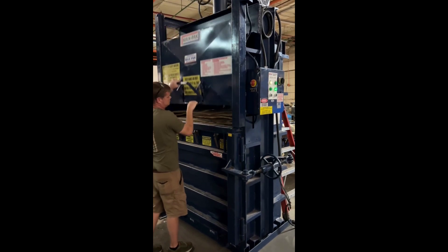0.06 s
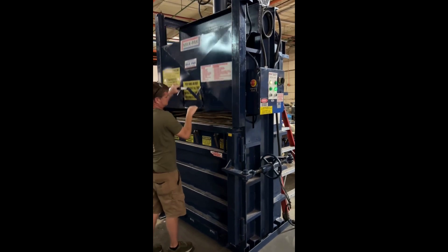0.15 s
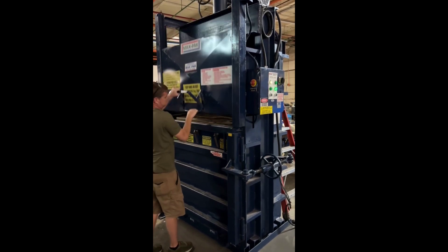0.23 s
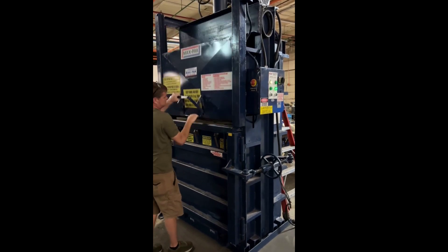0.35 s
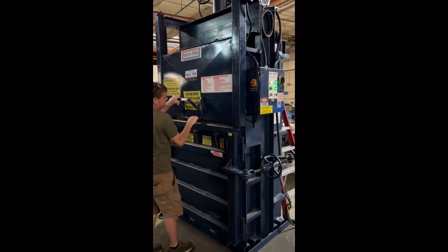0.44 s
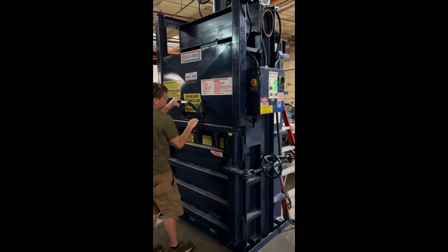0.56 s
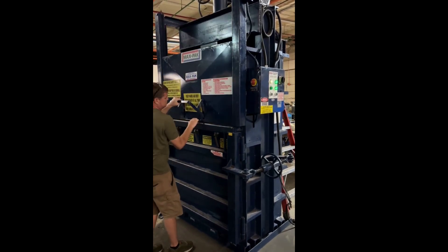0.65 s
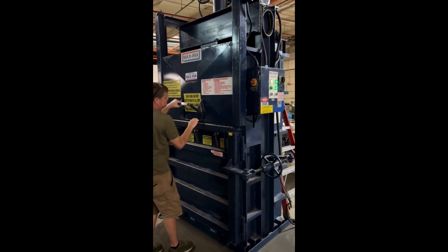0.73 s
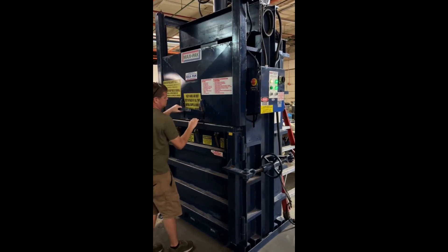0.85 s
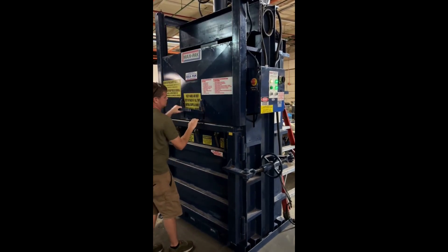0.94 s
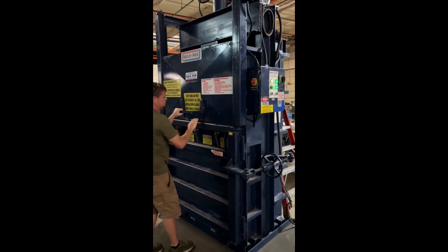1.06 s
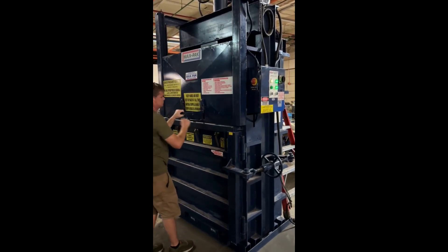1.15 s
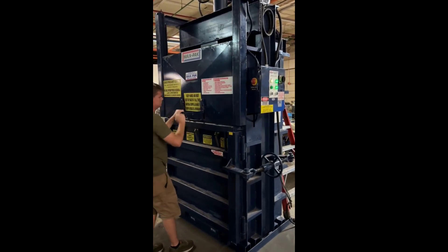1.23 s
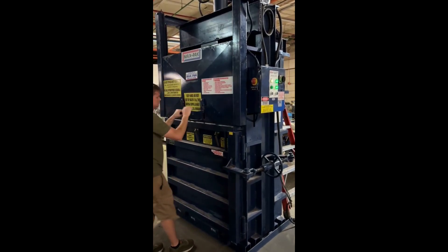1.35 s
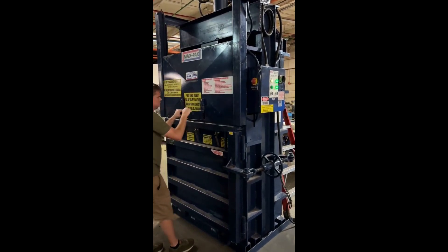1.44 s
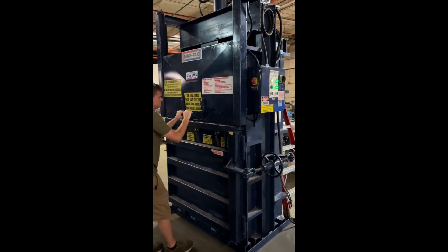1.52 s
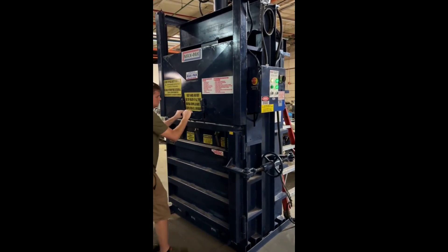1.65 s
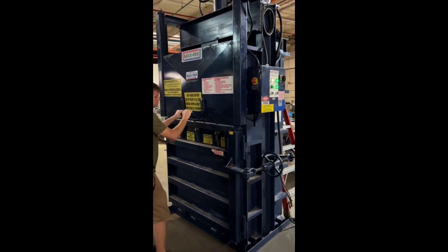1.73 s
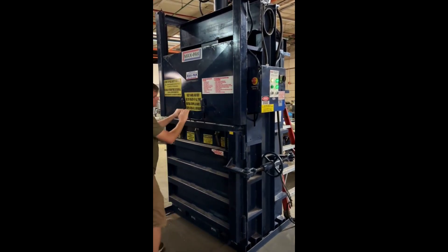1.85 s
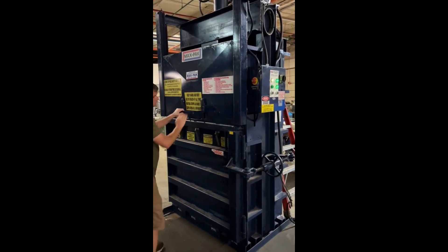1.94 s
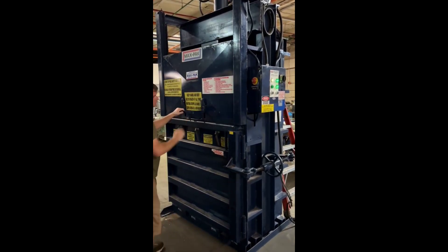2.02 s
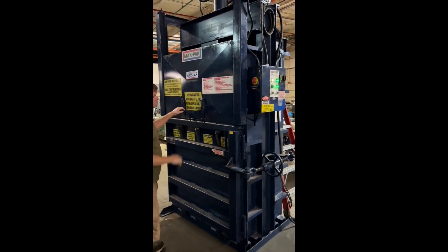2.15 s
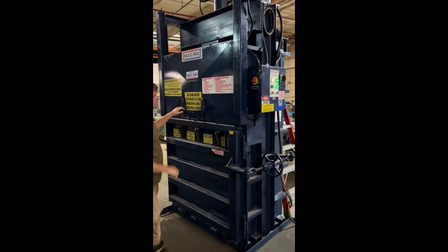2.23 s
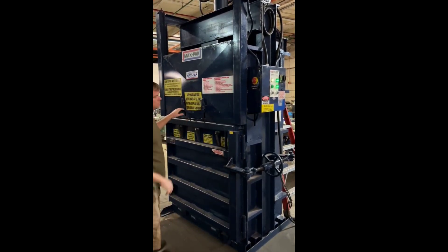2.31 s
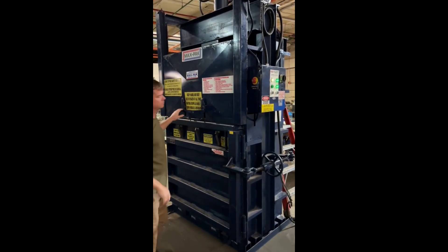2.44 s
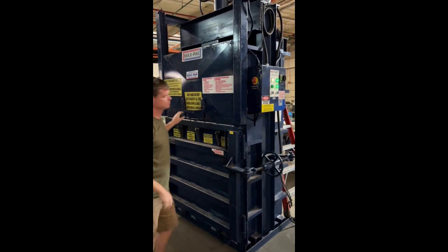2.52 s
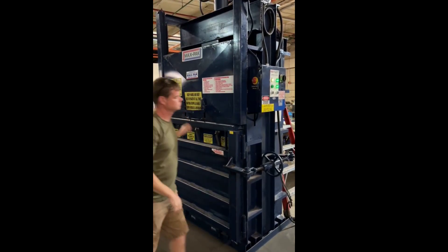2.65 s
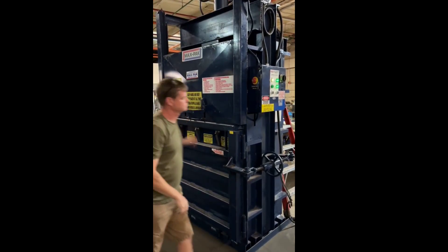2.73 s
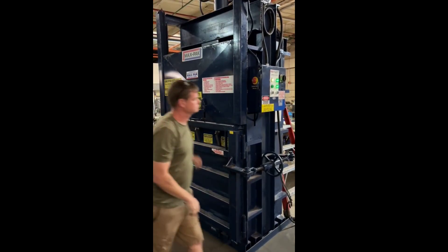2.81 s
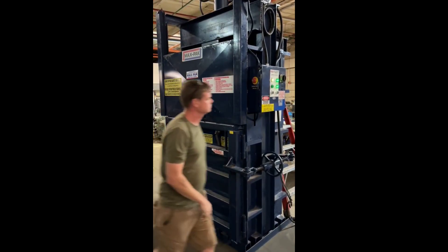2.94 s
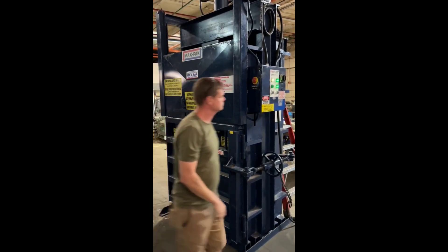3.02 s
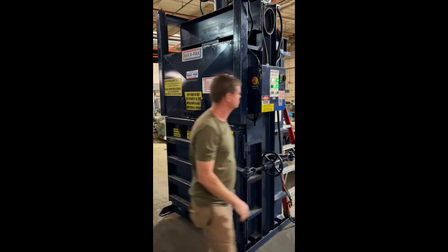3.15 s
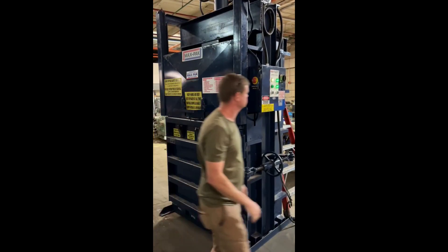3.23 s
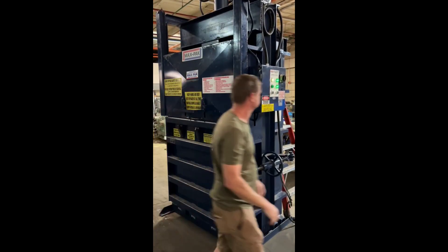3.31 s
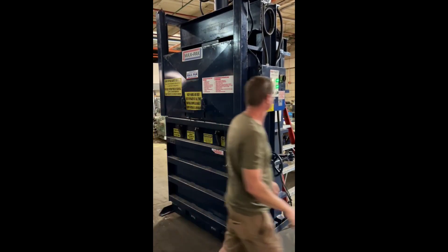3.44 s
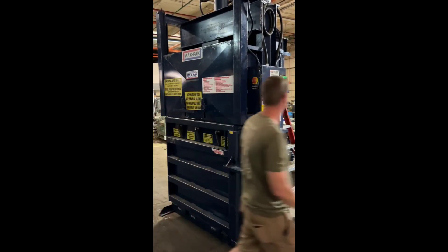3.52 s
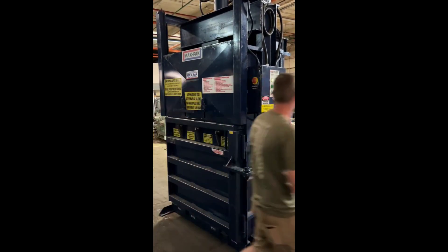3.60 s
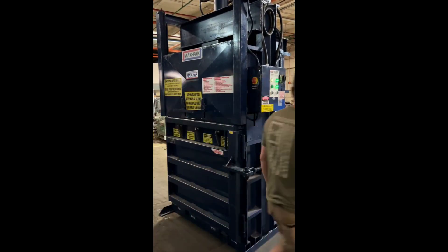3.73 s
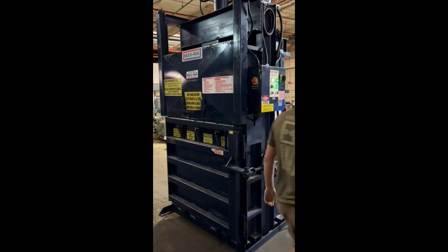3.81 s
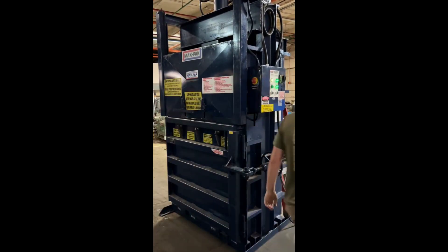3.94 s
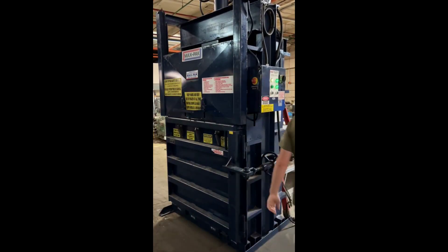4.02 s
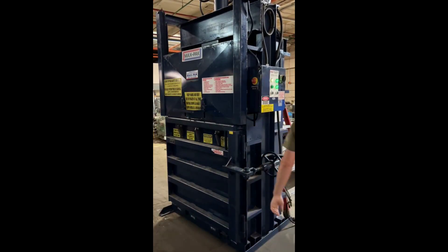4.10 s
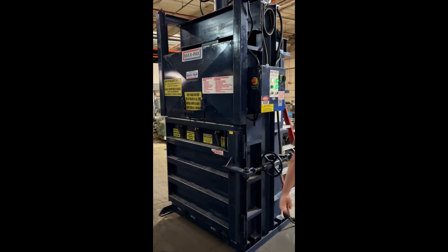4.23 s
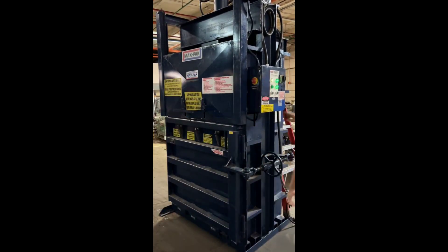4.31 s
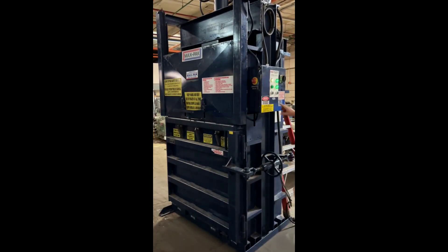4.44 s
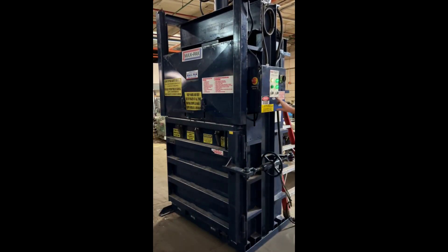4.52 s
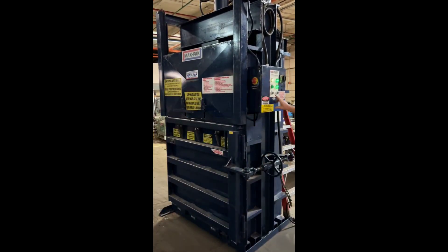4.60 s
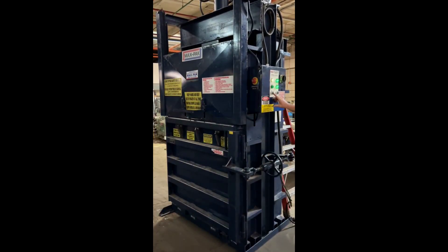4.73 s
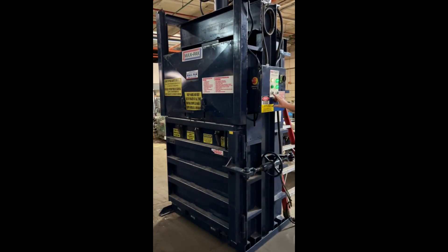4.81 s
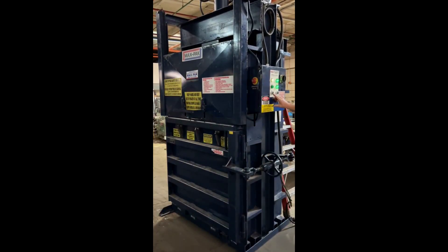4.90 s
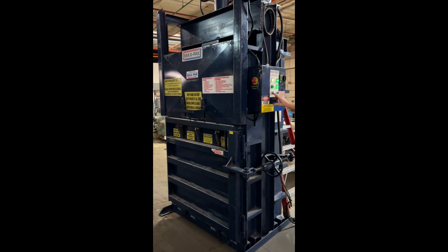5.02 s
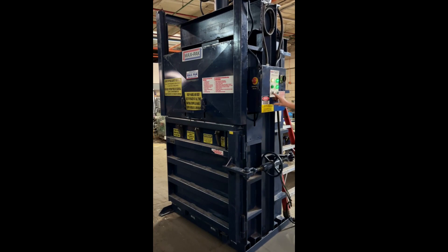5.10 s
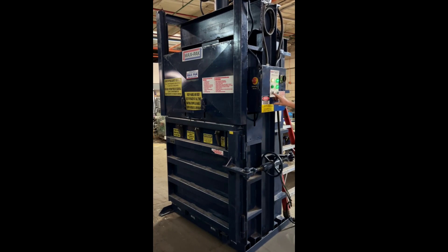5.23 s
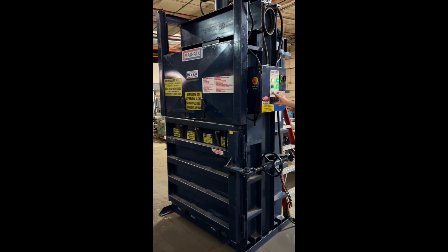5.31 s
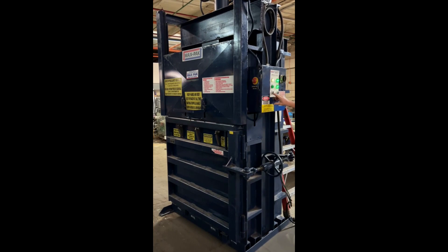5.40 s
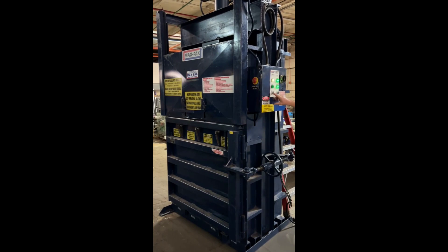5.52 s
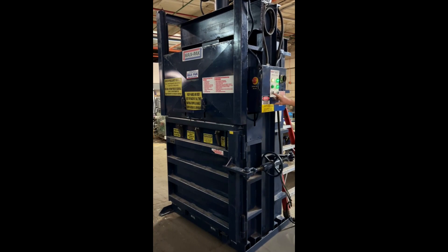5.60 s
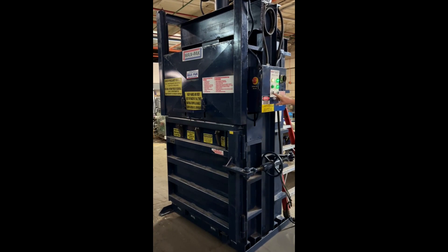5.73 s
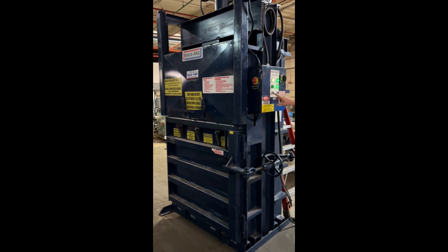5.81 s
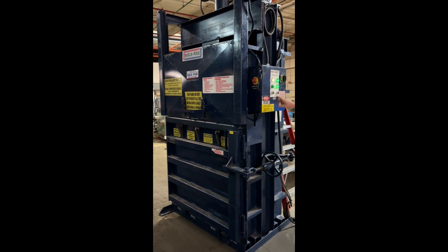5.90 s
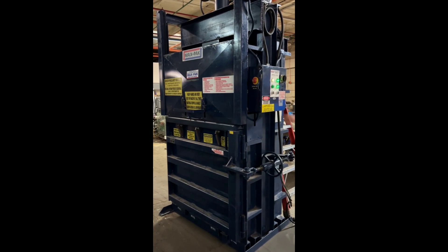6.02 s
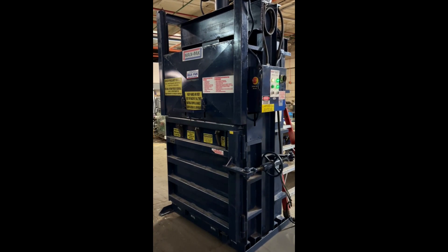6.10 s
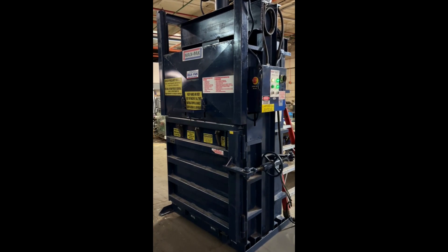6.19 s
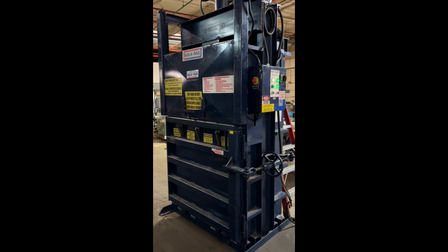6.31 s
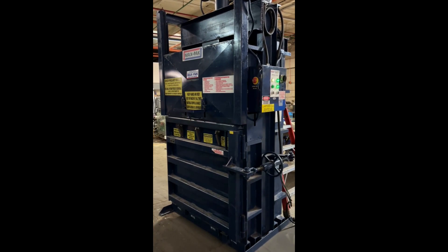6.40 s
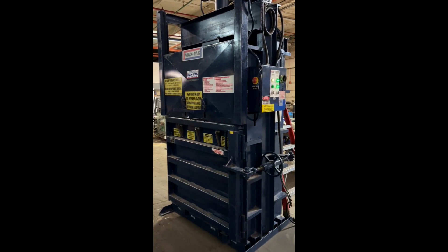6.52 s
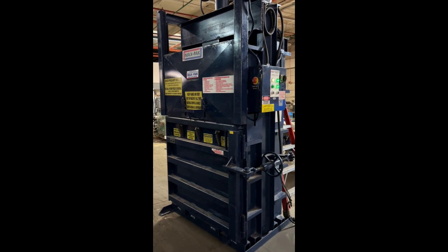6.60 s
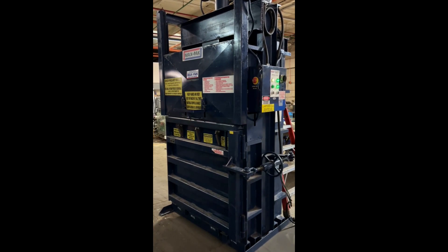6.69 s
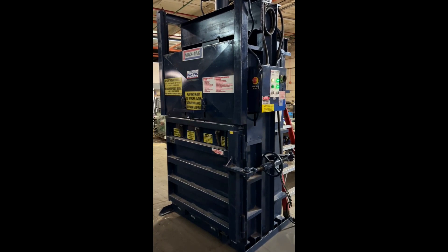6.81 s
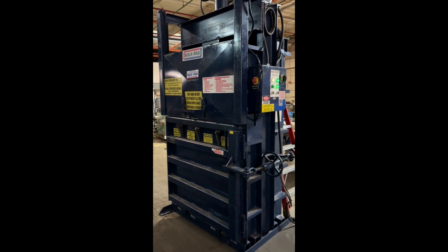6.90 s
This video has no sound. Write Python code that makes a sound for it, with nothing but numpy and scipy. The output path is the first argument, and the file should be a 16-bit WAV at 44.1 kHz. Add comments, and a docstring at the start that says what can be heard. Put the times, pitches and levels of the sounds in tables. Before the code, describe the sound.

Stereo phone pickup in a big, echoing warehouse over a low fan drone. First, rolling rumble and rail chatter, then a hard metallic crash with boomy frame ringing and scattered rattles, followed by smaller clank and a second double slam. Light shoe scuffs pass, one squeaking briefly. Finally a sharp electrical click, a short falling motor groan, and a pump's buzzing, oily hum that holds to the end.

```python
"""Baler gate and pump start

A steel gate rumbles down its rails, slams, rattles and is slammed again: noise bursts ring frame and plate.
Shoes scuff grit (gated noise) and squeak once (gliding tone). A contactor snaps, a motor groans (resonant
noise, falling tone) and a vane pump settles into a hum of shaft orders over oil churn and fan hiss.
A large warehouse drones and echoes; a phone's two ports hear it with a frequency-dependent lag."""
import sys
import numpy as np
from scipy import signal
from scipy.fft import rfft, irfft, next_fast_len
from scipy.io import wavfile
from scipy.ndimage import map_coordinates

SR = 44100
rng = np.random.default_rng(int(sys.argv[2]) if len(sys.argv) > 2 else 0)


def output_pcm(signal):
    """Save a mono or channel-first signal as 16-bit PCM at the path in sys.argv[1].

    Samples are clipped to [-1, 1] before scaling.
    """
    pcm = np.clip(np.atleast_2d(signal).T, -1, 1) * 32767
    wavfile.write(sys.argv[1], SR, np.round(pcm).astype(np.int16))


N = 306495

# Warehouse air. Each row: time in seconds, drone level in dB, mid-band wash level in dB.
AIR = [(0, -57.5, -39), (2.4, -48.5, -54), (3.2, -45, -55), (4.3, -46, -55), (5, -50.5, -54.5),
       (6.95, -61, -67)]
# Drone spectrum. Each row: frequency in Hz, relative level in dB per Hz.
DRONE_SPECTRUM = [(12, -62.5), (20, -40), (43, 9.5), (81, 5.5), (113, 1), (141, -12.5), (203, -10.5),
                  (271, -29.5), (400, -25.5), (520, -78), (880, -120)]
# Mid-band wash spectrum. Each row: frequency in Hz, relative level in dB per Hz.
WASH_SPECTRUM = [(200, 11.5), (400, 1.5), (1000, -0.5), (2000, -11.5), (4000, -16), (8000, -30),
                 (15000, -40)]
# Fan tones. Each row: frequency in Hz, amplitude in dB before the common lift.
FANS = [(91.5, -52), (113.0, -52.5), (204.6, -63), (242.2, -66.5)]
# Echo decay of the hall. Each row: frequency in Hz, T60 in seconds.
HALL_T60 = [(60, 1.98), (160, 1.4), (420, 1.6), (1100, 1.18), (2900, 1.56), (7700, 0.75), (14000, 0.26)]

# Rollers in the rails. Each row: frequency in Hz, relative level in dB per Hz.
RAIL_SPECTRUM = [(18, -39), (30, -28), (49, -6), (181, -4.5), (217, -1.5), (423, -10.5), (509, -6),
                 (955, -23), (2320, -23), (2500, -27), (3250, -60.5), (5500, -120)]
RUMBLE_DB, RATTLE_DB, SLOWS_DB_PER_S = -32.5, -47, -17.5  # quieter as the gate slows
JOLT_DB, JOLT_S = 8, 0.014  # extra level at the start, its decay
REST_S, SETTLE_S = 0.55, 0.02  # rollers come to rest, fade time

# Gate blows. Each row: start in seconds, crack level in dB before the plate, then boom, clang, sizzle
# and ring in dB re crack, and the centre in Hz of the modes rung hardest.
BLOWS = [(0.396, -39.5, 2.5, 2.5, 1, -2, 500), (0.539, -32, 1.5, -7, -13.5, -11, 600),
         (0.555, -16.5, 0, 6, -0.5, 3.5, 790), (0.575, -18, -3.5, -6.5, -4.5, -15, 1390),
         (0.585, -18.5, 6, -9.5, 3, 8.5, 90), (0.611, -23.5, 6, -1.5, -4, -10, 215),
         (0.632, -18.5, 0.5, 6.5, -4, 2, 750), (0.6456, -9, -16.5, -11, -1.5, -7, 3617),
         (0.6596, -18, 1, -10.5, 0.5, -5.5, 2315), (0.6792, -23.5, -1.5, -2.5, -5, 9, 265),
         (0.709, -30.5, -1, -0.5, -6.5, -4, 2200), (0.74, -33, 13.5, -1, -16.5, 6, 230),
         (0.781, -25, -3, 3.5, -1, -2, 1400), (0.809, -30, 10.5, -0.5, 2.5, -7, 700),
         (0.87, -36, 1.5, -5.5, -5.5, 8.5, 645), (0.9904, -28, 5.5, 2, 1.5, 1, 596),
         (1.039, -42, 4.5, 12.5, -20, -4, 595), (1.495, -42, 3, 12, 2.5, 5, 400),
         (1.5042, -23.5, 8, 4, 0.5, 2, 1500), (1.5224, -20, -2, 6, -5, 7, 650),
         (1.55, -30, 7.5, -1, 0.5, 5.5, 376), (1.61, -36.5, 8.5, 6.5, -30, 12.5, 560)]
# Modes of the heavy frame. Each row: frequency in Hz, relative level in dB, T60 in seconds.
FRAME_MODES = [(85.7, 0.5, 0.41), (164, -2.5, .5), (223, -6.5, 1), (273, 4.5, 0.13), (351, -3.5, 0.16),
               (402.6, -5, 0.52), (581, -5.5, 0.24), (658.3, 3.5, 0.072), (722, 1.5, 0.081),
               (1045, -7.5, 0.36), (1400, -7.5, 0.23), (1510, -4, 0.15), (2298, 0.5, 0.2),
               (3410, -5.5, 0.24), (3830, -11, 0.15)]
# Short plate resonances. Each row: frequency in Hz, width in Hz, level in dB.
PLATE = [(98, 75, 0.5), (163, 41, 2.5), (216.4, 52, -6), (303, 24, 3.5), (516, 110, -1), (631, 127, 3),
         (770, 87, -3), (1093, 53, 2), (1410, 190, -6), (1670, 36, -0.5), (1925, 160, -2.5),
         (2358, 220, 0.5), (2630, 140, 4.5), (3250, 540, 0.5), (5200, 900, -3)]
# Low body of a blow. Each row: frequency in Hz, relative level in dB per Hz.
BOOM_SPECTRUM = [(30, -35), (60, -2), (95, -10), (230, -2), (450, -10.5), (900, -55.5)]
# Middle of a blow. Each row: frequency in Hz, relative level in dB per Hz.
CLANG_SPECTRUM = [(150, -13), (350, -12.5), (670, 5.5), (1100, -3), (2300, -10), (4000, -62.5)]
# Sharp contact noise. Each row: frequency in Hz, relative level in dB per Hz.
CRACK_SPECTRUM = [(600, -14.5), (1500, -1.5), (2500, 2.5), (4500, 4.5), (5600, -1), (7000, -9.5),
                  (12000, -13)]
# Treble contact noise. Each row: frequency in Hz, relative level in dB per Hz.
SIZZLE_SPECTRUM = [(3000, -19.5), (6000, -3), (8500, 5.5), (12500, -5), (14000, -19.5), (16000, -21.5)]
CONTACT_S = 0.021  # base decay of a blow, scaled for each part
REACH_OCT, REACH_DB = 0.56, -15  # spread of the modes rung hardest, level of the modes beyond
TICKS, TICK_DB, TICK_FADE_DB_PER_S = 14, -8, 77  # loose parts per blow, level re crack, later ones weaker
TICK_SPREAD_S, TICK_HZ, TICK_OCT, TICK_T60_S = 0.037, 3310, 0.6, 0.04  # mean delay; pitch, its spread; ring

# Scuffs. Each row: start in seconds, scrape level in dB, thud in dB re scrape, hiss in dB re scrape,
# scrape centre in Hz, length in seconds.
SCUFFS = [(1.929, -62, -21.5, 1, 2460, 0.022), (2.097, -57, -2.5, -6.5, 2957, 0.057),
          (2.133, -48, -15, -20, 2102, 0.012), (2.29, -62, -2, -5.5, 2470, 0.1),
          (2.622, -55, 5.5, 6, 1950, 0.0293), (2.639, -44, -3.5, -25.5, 500, 0.033),
          (2.655, -39.5, -14, -20.5, 1550, 0.07), (2.677, -44.5, -25, -7, 3420, 0.043),
          (2.711, -45, -11, -17, 1800, 0.06), (2.8184, -45, -10.5, -8.5, 2550, 0.039),
          (2.843, -52, 0.5, -5, 900, 0.032), (2.97, -54.5, -19, -7, 2030, 0.049),
          (3.049, -52.5, -12, -8, 3006, 0.012), (3.261, -45.5, 3, -7, 1210, 0.0058),
          (3.3335, -30.5, -12.5, -14, 1770, 0.032), (3.361, -31.5, -11, -16, 1880, 0.017),
          (3.382, -47.5, -10.5, -15, 2200, 0.022), (3.424, -42, -4.5, -6, 2250, 0.034),
          (3.56, -57, -2, -4.5, 1820, 0.051), (3.985, -52.5, 0.5, -7.5, 1300, 0.047),
          (4.016, -60, -2.5, -9, 2630, 0.15), (4.156, -63, 3, 5, 3000, 0.015),
          (4.604, -67, 4, 6, 3450, 0.023), (4.791, -54, -5.5, -11.5, 1566, 0.087)]
# Sole thud. Each row: frequency in Hz, relative level in dB per Hz.
SOLE_SPECTRUM = [(200, -25), (450, -7.5), (900, -1), (1800, -42.5)]
# Grit hiss. Each row: frequency in Hz, relative level in dB per Hz.
GRIT_SPECTRUM = [(2500, -27), (5000, 2.5), (9000, 1), (15000, -10.5)]
# Sole resonances. Each row: frequency in Hz, width in Hz, level in dB.
TREAD = [(1143, 130, 1.5), (1640, 120, 3.5), (2002, 58, 7), (2260, 75, 4.8), (3250, 240, -1.5),
         (5010, 210, 7.5), (466, 65.2, -2), (770, 87, -5)]
SCRAPE_WIDTH = 1.52  # scrape band over its centre
BITE_S, BITE_DB = 0.0015, -32.5  # attack of a scuff of that level
SOFTENS = 0.51  # lighter scuffs start more slowly, dB of time per dB
# Rubber squeak. Each row: time in seconds, pitch in Hz before jitter, level in dB.
SQUEAK = [(2.641, 474, -70), (2.646, 475, -40.5), (2.66, 498, -40.5), (2.667, 906, -40), (2.673, 1200, -38),
          (2.68, 1300, -70)]

# Shaft speed. Each row: time in seconds, turns per second.
SPEED = [(5.07, 26), (5.42, 29.5), (5.52, 29.92), (6.95, 29.92)]
# Start-up strain. Each row: time in seconds, groan level in dB, winding pull level in dB.
STRAIN = [(5.06, -69, -59), (5.075, -26.5, -26), (5.15, -22.5, -16.5), (5.185, -30.5, -30),
          (5.225, -29, -25), (5.3, -33, -28), (5.34, -35, -48), (5.5, -38, -72), (5.57, -38, -80),
          (5.6, -88, -90)]
# Frame resonances of the groan. Each row: frequency in Hz, width in Hz, relative level in dB.
GROAN = [(73, 25, -5), (162, 29, -7), (226, 38, -6), (336, 48, -4.5), (467, 32, -10.5), (581, 40, -16.5),
         (744, 97, -17.5), (1000, 65, -19.5), (1240, 110, -29.5), (1560, 67, -35)]
# Oil churn. Each row: frequency in Hz, relative level in dB per Hz.
CHURN_SPECTRUM = [(40, 0.5), (100, -7), (250, -3), (450, -9), (700, -6), (1200, -8.5), (2000, -12),
                  (2700, -16), (4500, -16), (7000, -37)]
# Pump housing resonances. Each row: frequency in Hz, width in Hz, level in dB.
HOUSING = [(325.3, 34, 4.5), (699, 50, 6.5)]
# Fan hiss, also the colour of the whine. Each row: frequency in Hz, relative level in dB per Hz.
HISS_SPECTRUM = [(1500, -20), (3500, -4), (5500, -2), (7000, 0), (10000, -1.5), (13700, -2.5), (15000, -18)]
# Oil rasping past the valve. Each row: frequency in Hz, relative level in dB per Hz.
RASP_SPECTRUM = [(1500, -27), (2400, -5.5), (2700, -2), (3100, -2.5), (3600, 3.5), (4000, -11), (5500, -30)]
# Harmonics of the vane rate. Each entry: level in dB at MID_S under full load.
VANE_DB = [-41.5, -42, -47.5, -55, -55, -55, -57]
# Change of those harmonics as the ram travels. Each entry: dB per second.
VANE_DB_PER_S = [-3.5, 5, -1, -1, 2, -5.5, 9.5]
# Other shaft orders. Each entry: cycles per turn.
SHAFT_ORDERS = [4, 8, 9, 10, 11, 13, 20, 22, 23, 25, 32, 34, 35, 43, 45, 46, 52, 54, 55, 63, 69, 89, 91,
                119, 132]
# Their levels. Each entry: dB at MID_S under full load.
SHAFT_DB = [-51.5, -52.5, -55.5, -45.5, -40, -51.5, -56.5, -50.5, -39.5, -48, -60.5, -63, -51.5, -60, -66,
            -59, -60.5, -65, -61, -67, -71, -69, -66, -69, -61]
# Their change. Each entry: dB per second.
SHAFT_DB_PER_S = [14, -6, 1.5, -2, 4, -7, 8, 4.5, 6.5, -6.5, 11, 15.5, -1, 13, -3, -3, -11, -6, 7, -15, 1,
                  12, -3, -3, 9]
ON_S = 5.06  # current flows
ON = round(ON_S * SR)
VANES, LATE_ORDER, MID_S = 12, 24, 6.25  # orders above LATE_ORDER rise more steeply with pressure
LOADED_S, LOADS_DB_PER_S = 5.624, 56  # pump pressure climbs until then and holds
HUNT_DB, HUNT_HZ, HUNT_S, HUNT_PEAK_S = 4.5, 6.9, 0.26, 5.58  # pressure hunts: depth, rate, settling, a crest
CHURN_DB, IDLE_DB, PRIME_S = -38, -9, 0.21  # churn under load, its drop while idle, time to fill
KICK_DB, KICK_S = -39.5, 0.053  # oil jerked into motion, its decay
HISS_DB, SPIN_UP_DB, SPIN_UP_S = -44.5, -9, 0.036  # fan hiss, its lack at the start, recovery
WHINE_DB, RASP_DB = -44, -51.5  # under full load; rasp at MID_S
PULL_HZ, SLIP_HZ = 239, 79.95  # windings pull at four times the mains; this much sharper at first
SETTLES_S, SLIP_S, INRUSH_S = 5.124, 0.011, 0.26  # pull drops about then, over this time; inrush length

# Contactor resonances. Each row: frequency in Hz, width in Hz, relative level in dB.
SNAP = [(1430, 500, -4), (2320, 670, -2), (3570, 300, 1), (4320, 450, 4.5), (8730, 2700, -8)]
SNAP_S, SNAP_DB = 5.0655, -27  # the armature shuts

# Likeness of the two ports. Each row: frequency in Hz, correlation.
ALIKE = [(100, .998), (170, .99), (350, .97), (700, .9), (1500, .8), (2700, .6), (3500, .35), (4800, .4),
         (5600, .92), (15000, .9)]
# Lead of the right port. Each row: frequency in Hz, phase in radians.
LEAD = [(0, 0), (700, .6), (1200, .6), (1700, 0), (2100, -1.2), (2750, -3.1), (3450, -3.6), (4100, -6.6),
        (6000, -9.42), (16000, -24.2)]
# Level tilt of the ports. Each row: frequency in Hz, left minus right in dB.
TILT = [(60, .2), (250, .8), (500, 2), (1000, 3.5), (1700, 1), (2700, -3), (5500, 0)]
# Port colour. Each row: frequency in Hz, gain in dB.
MIC = [(1400, 1), (2000, -1.5), (2700, 3.5), (4000, -3), (5500, -3.5), (7000, 0.5)]
LOW_HZ, TOP_HZ = 40, 15800  # bass is lost below, nothing passes above


def amp(db):
    """dB to gain."""
    return 10 ** (np.asarray(db) / 20)


def unit(x):
    """Scaled to rms 1."""
    return x / np.sqrt(np.mean(x ** 2) + 1e-20)


def along(points, hz):
    """(Hz, value) points interpolated on a log frequency axis."""
    f, v = np.transpose(points)
    return np.interp(np.log(hz + 1), np.log(f + 1), v)


def curves(rows):
    """One value per sample for each column after the time."""
    s, *cols = np.transpose(rows)
    return [np.interp(np.arange(N) / SR, s, c) for c in cols]


def wobble(rate_hz):
    """A smooth random curve, rate_hz knots a second."""
    knots = rng.standard_normal(int(N * rate_hz / SR) + 4)
    return map_coordinates(knots, [np.arange(N) * rate_hz / SR])


def filtered(x, response):
    """x times a response of frequency."""
    n = x.shape[-1]
    m = next_fast_len(n + 4096)
    return irfft(rfft(x, m) * response(np.fft.rfftfreq(m, 1 / SR)), m)[..., :n]


def bank(peaks, floor=0):
    """Response of resonances of alternating sign over a flat floor."""
    def response(f):
        total = floor
        for k, (centre, width, db) in enumerate(peaks):
            damping = 1j * f * width
            total = total + (-1) ** k * amp(db) * damping / (centre * centre - f * f + damping)
        return total
    return response


def noise(spectrum, size=N):
    """Two unrelated noises of one colour, rms 1."""
    return unit(filtered(rng.standard_normal((2, size)), lambda hz: amp(along(spectrum, hz))))


def resonant(peaks, size=N):
    """Two unrelated noises through resonances, rms 1."""
    return unit(filtered(rng.standard_normal((2, size)), bank(peaks)))


def add(track, sound, s):
    """Mix a sound in at time s."""
    part = track[:, round(s * SR):][:, :sound.shape[1]]
    part += sound[:, :part.shape[1]]


def hall(x, wet_db, spread=None):
    """Sound plus echo, each frequency dying at its own speed; spread, if given, feeds the echo instead."""
    hz, t, z = signal.stft(rng.standard_normal((2, SR * 3 // 2)), SR, nperseg=256)
    decay = amp(-60 * t / along(HALL_T60, hz)[:, None])
    tail = signal.istft(z * decay, SR, nperseg=256)[1]
    tail = tail * (1 - np.exp(-np.arange(tail.shape[1]) / SR / 0.0021))  # echoes thicken at first
    source = x if spread is None else spread
    out = amp(wet_db) * signal.fftconvolve(source, tail / np.linalg.norm(tail[0]), axes=1)
    add(out, x, 0)
    return out


def warehouse():
    """Ventilation drone with fan tones unsteady in level and phase, and a mid-band wash."""
    drone_db, wash_db = curves(AIR)
    t = np.arange(N) / SR
    out = amp(drone_db + 1.7 * wobble(19)) * noise(DRONE_SPECTRUM)
    for hz, db in FANS:
        level = amp(db + 2.0 + 4.1 * wobble(3.2))
        out += level * np.sin(2 * np.pi * hz * t + 1.9 * wobble(4.7))
    return out + amp(wash_db + 0.31 * wobble(2.4)) * noise(WASH_SPECTRUM)


def slide():
    """Rollers rumble and chatter in the rails until the gate stops."""
    t = np.arange(N) / SR
    moving = amp(SLOWS_DB_PER_S * t + JOLT_DB * np.exp(-t / JOLT_S))
    moving = moving * np.exp(-np.maximum(t - REST_S, 0) / SETTLE_S)
    shake = amp(0.73 * wobble(48))
    rumble = amp(RUMBLE_DB) * noise(RAIL_SPECTRUM)
    rattle = amp(RATTLE_DB) * unit(noise(CRACK_SPECTRUM) + 0.23 * noise(SIZZLE_SPECTRUM))
    return moving * shake * (rumble + rattle)


def frame_ring(t, centre_hz):
    """Decaying frame modes; those near centre_hz ring hardest, each slightly scattered."""
    ring = 0
    for hz, db, t60_s in FRAME_MODES:
        reach_db = REACH_DB * (1 - np.exp(-(np.log2(hz / centre_hz) / REACH_OCT) ** 2))
        level = amp(db + reach_db + rng.normal(0, 2.2) - 60 * t / t60_s)
        ring = ring + level * np.sin(2 * np.pi * (hz * rng.normal(1, 0.0078) * t + rng.random((2, 1))))
    return ring * (1 - np.exp(-t / 0.004))


def clatter(t):
    """Loose parts knock in the wake of a blow, each ringing briefly at its own pitch."""
    late_s = rng.exponential(TICK_SPREAD_S, (TICKS, 1))
    pitch = rng.standard_normal((TICKS, 1))
    size = rng.standard_normal((TICKS, 1))
    u = np.maximum(t[:SR // 3] - late_s, 0)  # seconds since each knock
    rings = amp(TICK_DB + 2.2 * size - TICK_FADE_DB_PER_S * late_s - 60 * u / TICK_T60_S)
    rings = rings * (1 - np.exp(-u / 0.0012))
    hz = TICK_HZ * 2 ** (TICK_OCT * pitch)
    pair = [np.sum(rings * np.sin(2 * np.pi * hz * u * stretch), axis=0) for stretch in (1, 1.01)]
    return np.pad(pair, ((0, 0), (0, len(t) - SR // 3)))


def gate():
    """Each blow is a burst of contact noise through the plate; where it lands sets the frame's ring."""
    out, t = np.zeros((2, N)), np.arange(SR * 3 // 5) / SR
    size = len(t)

    def burst(slow):
        return (1 - np.exp(-t / (0.0016 * slow))) * np.exp(-t / (slow * CONTACT_S))

    smeared = [(hz, 4 * width, level - 3) for hz, width, level in PLATE]  # blurred over all directions
    for s, db, boom_db, clang_db, sizzle_db, ring_db, centre_hz in BLOWS:
        chatter = unit(amp(2 * map_coordinates(rng.standard_normal(400), [t * 330])))  # loose parts rattle
        crack = noise(CRACK_SPECTRUM, size) + amp(sizzle_db) * noise(SIZZLE_SPECTRUM, size)
        crack = chatter * crack * burst(0.81)
        clang = chatter * amp(clang_db) * noise(CLANG_SPECTRUM, size) * burst(1.83)
        boom = amp(boom_db) * noise(BOOM_SPECTRUM, size) * burst(3.95)
        ring = amp(ring_db) * frame_ring(t, centre_hz)
        contact = crack + clang + boom
        # the panel is held differently at each blow
        flexed = [(hz * rng.normal(1, 0.03), width, level + rng.normal(0, 1.5)) for hz, width, level in PLATE]
        direct = filtered(contact, bank(flexed, floor=0.4)) + clatter(t) + ring
        spread = filtered(contact, bank(smeared, floor=0.4)) + amp(-8.0) * ring
        add(out, hall(amp(db) * direct, wet_db=-8.5, spread=amp(db) * spread), s)
    return out


def scuffs():
    """A sole drags grit over concrete for a moment and lifts off: grainy noise through sole resonances."""
    out, t = np.zeros((2, N)), np.arange(SR // 4) / SR
    size = len(t)
    for s, db, thud_db, hiss_db, hz, length_s in SCUFFS:
        attack_s = BITE_S * amp(SOFTENS * (BITE_DB - db))
        stroke = (1 - np.exp(-t / attack_s)) * np.exp(-(t / length_s) ** 3.5)
        grain = unit(amp(2.1 * map_coordinates(rng.standard_normal(400), [t * 400])))
        edge = 1 + SCRAPE_WIDTH / 2
        band = [(hz / 4, -30), (hz / edge, -3), (hz, 0), (hz * edge, -4), (hz * 4, -25)]
        # the sole bends differently at each step
        tread = [(c * rng.normal(1, 0.02), w, level + rng.normal(0, 1.5)) for c, w, level in TREAD]
        drag = noise(band, size)
        scrape = unit(filtered(drag, bank(tread, floor=0.25)))
        rest = amp(thud_db) * noise(SOLE_SPECTRUM, size) + amp(hiss_db) * noise(GRIT_SPECTRUM, size)
        envelope = amp(db) * stroke * grain
        add(out, hall(envelope * (scrape + rest), wet_db=-9.5, spread=envelope * (drag + rest)), s)
    return out


def squeak():
    """A short rubber squeak, two harmonics, that jumps upward as the sole lets go."""
    pitch_hz, db = curves(SQUEAK)
    phase = 2 * np.pi * np.cumsum(pitch_hz * amp(0.29 * wobble(150))) / SR
    t = np.arange(N) / SR
    sounding = (t > SQUEAK[0][0]) * (t < SQUEAK[-1][0])
    x = amp(db) * (np.sin(phase) + 0.3 * np.sin(2 * phase)) * sounding
    return hall(x * np.array([[1], [0.4]]), wet_db=-8)[:, :N]


def inrush():
    """Inrush shakes the frame's resonances while the windings pull at a falling pitch."""
    groan_db, pull_db = curves(STRAIN)
    t = np.arange(N) / SR
    slip = (1 - np.tanh((t - SETTLES_S) / SLIP_S / 2)) / 2
    pull = np.sin(2 * np.pi * np.cumsum(PULL_HZ + SLIP_HZ * slip) / SR)
    pull = amp(pull_db + 0.92 * wobble(18)) * pull * np.array([[1], [0.2]])
    return (amp(groan_db) * resonant(GROAN) + pull) * (np.arange(N) >= ON)


def pump_orders():
    """(shaft order, dB, dB per s): vane harmonics and other shaft orders."""
    vane_orders = [VANES * k for k in range(1, len(VANE_DB) + 1)]
    vanes = list(zip(vane_orders, VANE_DB, VANE_DB_PER_S))
    return vanes + list(zip(SHAFT_ORDERS, SHAFT_DB, SHAFT_DB_PER_S))


def pump_hum(t, turn, load):
    """Tones locked to the shaft rise with pressure; shaft shudder blurs the high orders."""
    twist = turn + 0.008 * wobble(40)[ON:] + 0.02 * wobble(6)[ON:]
    hum = 0
    for k, db, db_per_s in pump_orders():
        level = amp(db + db_per_s * (t - MID_S) + 1.0 * wobble(14)[ON:] + 2.1 * wobble(3.5)[ON:])
        tone = np.sqrt(2) * np.sin(k * twist + 2 * np.pi * rng.random()) * np.array([[1], [0.3]])
        hum = hum + load ** max(k / LATE_ORDER, 1) * level * tone
    return hum


def oil_churn(t, turn):
    """Oil noise in the housing, kicked at the start, surging once a turn, filling as the pump primes."""
    beat = (1 + 0.3 * np.sin(turn)) * amp(0.6 * wobble(12)[ON:] + 0.5 * wobble(90)[ON:])
    flow = amp(CHURN_DB + IDLE_DB * np.clip((LOADED_S - t) / PRIME_S, 0, 1))
    flow = flow + amp(KICK_DB) * np.exp(-(t - ON_S) / KICK_S)
    housed = unit(filtered(noise(CHURN_SPECTRUM), bank(HOUSING, floor=0.64)))[:, ON:]
    return np.clip((t - ON_S) / 0.026, 0, 1) * flow * beat * housed


def whine(turn):
    """Bearing and vane noise that repeats every turn."""
    cycle = noise(HISS_SPECTRUM, size=round(SR / SPEED[-1][1]))
    place = turn / (2 * np.pi) % 1
    return amp(WHINE_DB) * np.array([np.interp(place, np.arange(len(c)) / len(c), c) for c in cycle])


def rasp(t, turn):
    """Oil rasps past the valve, pulsing at the vane rate."""
    level = amp(RASP_DB + 1.5 * (t - MID_S) + 1.2 * wobble(11)[ON:] + 2.5 * wobble(300)[ON:])
    return level * (1 + 0.5 * np.sin(VANES * turn)) * noise(RASP_SPECTRUM)[:, ON:]


def fan_hiss(t):
    """Fan air noise swells as the motor spins up."""
    level = amp(HISS_DB + SPIN_UP_DB * np.exp(-(t - ON_S) / SPIN_UP_S) + 0.44 * wobble(7.3)[ON:])
    return level * np.clip((t - ON_S) / 0.015, 0, 1) * noise(HISS_SPECTRUM)[:, ON:]


def motor():
    """Inrush, then pump sounds that follow shaft angle and a pressure that climbs and hunts."""
    turn = 2 * np.pi * np.cumsum(curves(SPEED)[0][ON:]) / SR  # shaft angle, rad
    t = np.arange(ON, N) / SR
    load = amp(LOADS_DB_PER_S * np.minimum(t - LOADED_S, 0))
    swing = np.cos(2 * np.pi * HUNT_HZ * (t - HUNT_PEAK_S))
    settling = np.exp(-np.maximum(t - HUNT_PEAK_S, 0) / HUNT_S)
    hunt = amp(HUNT_DB * swing * settling * (t > ON_S + INRUSH_S))
    running = hunt * pump_hum(t, turn, load) + np.sqrt(hunt) * oil_churn(t, turn)
    running = running + load * (whine(turn) + rasp(t, turn)) + fan_hiss(t)
    out = inrush()
    add(out, running, ON_S)
    return out


def contactor():
    """The armature snaps shut: a short burst of resonant noise."""
    out, t = np.zeros((2, N)), np.arange(SR // 8) / SR
    burst = (1 - np.exp(-t / 0.0015)) * np.exp(-t / 0.016)
    add(out, hall(amp(SNAP_DB) * burst * resonant(SNAP, size=len(t)), wet_db=-23.5), SNAP_S)
    return out


def scene():
    """Two versions of the sound field: what the ports share and what differs."""
    return warehouse() + slide() + gate() + scuffs() + squeak() + motor() + contactor()


def record(dry):
    """Ports share most of the field, shifted in phase and level between them, within the microphone's band."""
    dry = dry / (1 + np.abs(dry / 0.8) ** 4) ** (1 / 4)  # the loudest blows saturate softly

    def mix(hz):
        angle = np.arccos(np.clip(along(ALIKE, hz), -1, 1)) / 2
        return np.array([np.cos(angle), np.sin(angle)])

    def ports(hz):
        shift = np.log(amp(along(TILT, hz))) - 1j * np.interp(hz, *np.transpose(LEAD))
        band = (hz < TOP_HZ) * hz ** 2 / (hz ** 2 + LOW_HZ ** 2)
        return np.exp(np.array([[0.5], [-0.5]]) * shift) * amp(along(MIC, hz)) * band

    shared, own = filtered(dry, mix)
    return filtered(np.array([shared + own, shared - own]), ports)


dry = scene()
out = record(dry)
output_pcm(out)
```